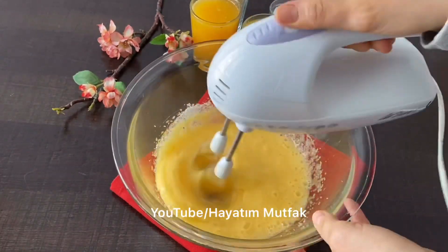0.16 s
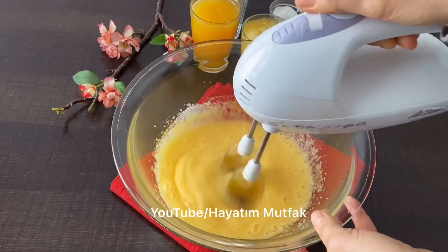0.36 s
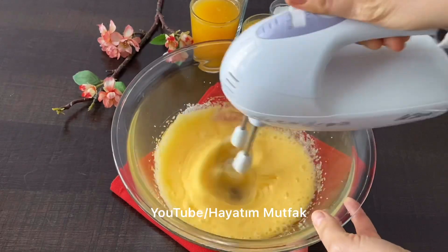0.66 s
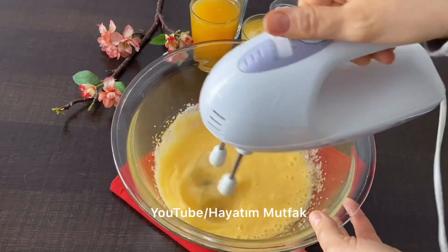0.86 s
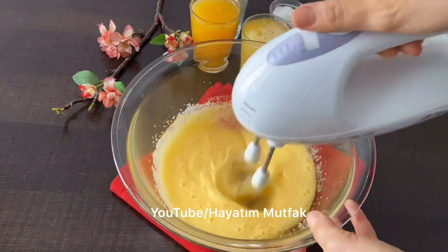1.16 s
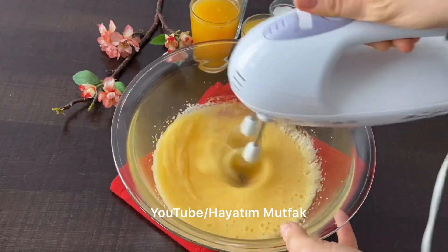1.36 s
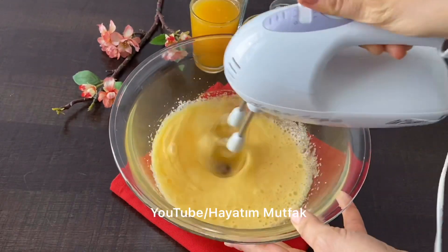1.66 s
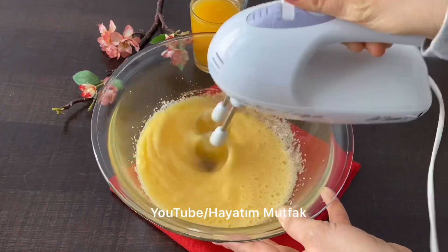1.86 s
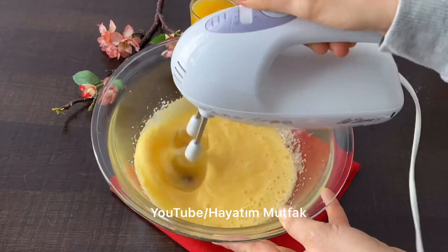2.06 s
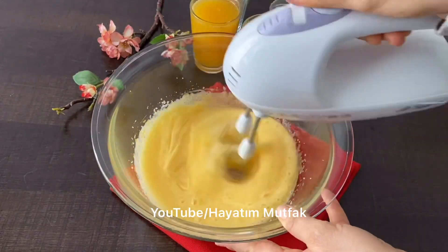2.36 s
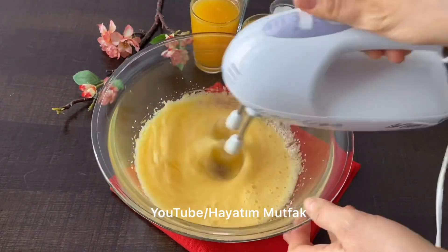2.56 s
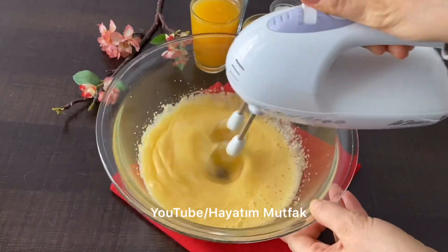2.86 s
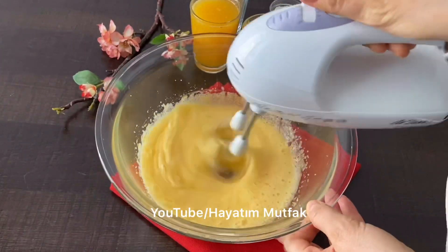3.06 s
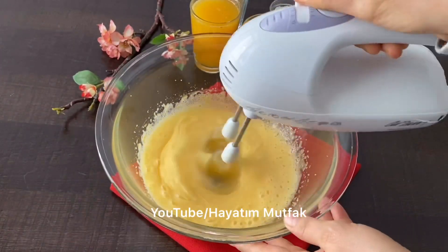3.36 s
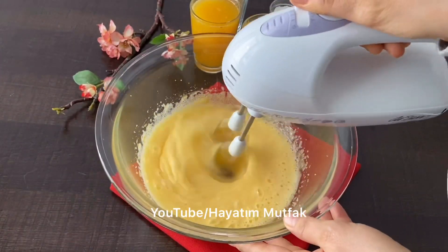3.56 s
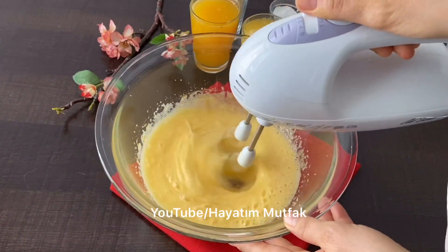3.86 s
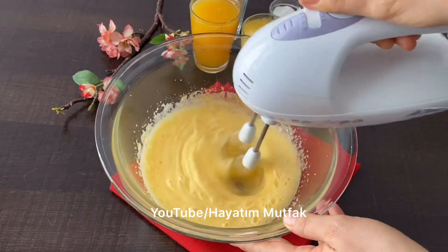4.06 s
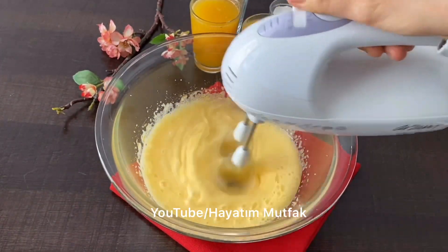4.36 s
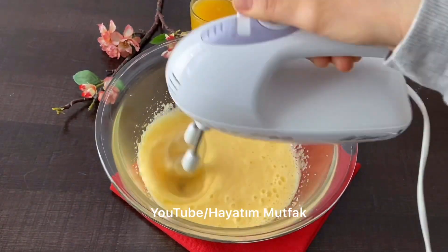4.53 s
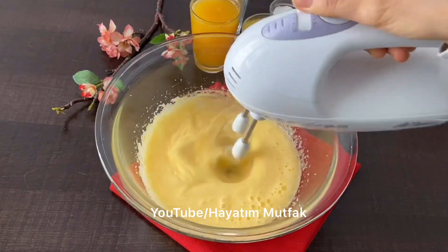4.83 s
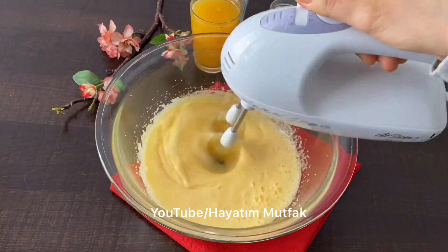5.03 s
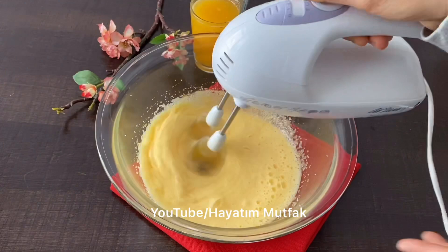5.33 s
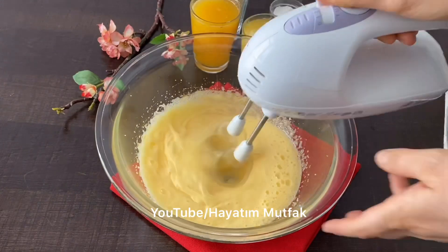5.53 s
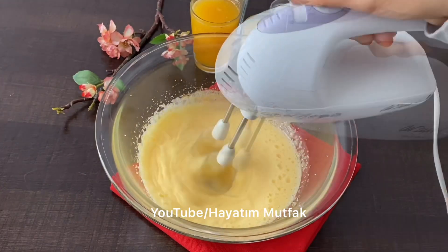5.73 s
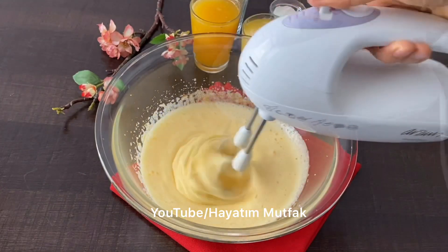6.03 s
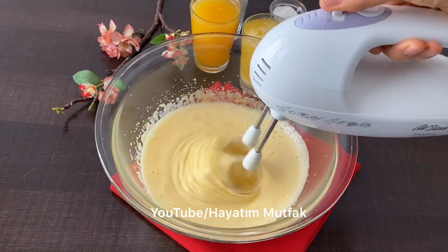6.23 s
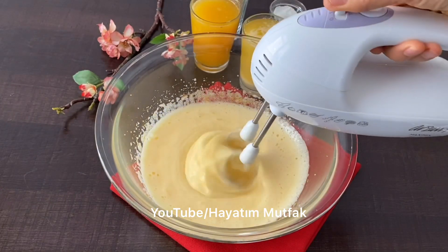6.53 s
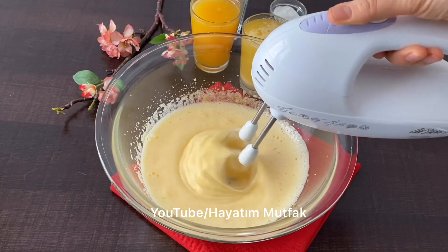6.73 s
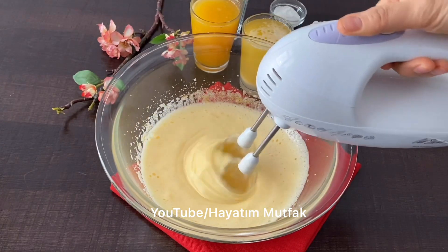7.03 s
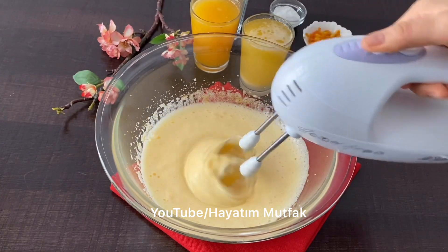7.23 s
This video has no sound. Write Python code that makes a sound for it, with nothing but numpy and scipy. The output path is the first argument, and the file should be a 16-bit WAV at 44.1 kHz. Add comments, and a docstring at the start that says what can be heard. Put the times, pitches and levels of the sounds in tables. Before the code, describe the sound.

A hand mixer whips eggs and sugar, heard very near in an ordinary room. Its wavering whine shifts slightly with the hand, over brush hiss, low pulsing slosh and small splashes. After a metallic tick it swells smoothly into a coarse top-speed growl of motor, gears and air. A sharp plastic click cuts the power; the pitch sinks while soft scrapes brush past.

```python
"""In a kitchen, close to a stereo pair of microphones, an electric hand mixer whips eggs and sugar
in a glass bowl. On low speed the fan whines in phase-locked tones, the brushes whistle and hiss, and
the beaters churn the batter in filtered noise. That fades into top speed: a rough roar of shaft tones
and noise. The switch snaps off in ringing modes and the motor winds down, throbbing, with soft scrapes."""
import sys
import numpy as np
from scipy import signal
from scipy.fft import rfft, irfft, next_fast_len
from scipy.io import wavfile
from scipy.ndimage import uniform_filter1d

SR = 44100
rng = np.random.default_rng(int(sys.argv[2]) if len(sys.argv) > 2 else 0)


def generate_wav(sig):
    """Save sig (samples, or channels by samples) to the path in sys.argv[1] as 16-bit PCM at SR."""
    pcm = np.round(np.clip(np.atleast_2d(sig).T, -1, 1) * 32767).astype(np.int16)
    wavfile.write(sys.argv[1], SR, pcm)


N = 325892

FAN_BLADES = 8  # blades that pass in one turn of the shaft
BLADES_PER_WIRE, BLADES_PER_TURN = 20, 80  # blades per passing beater wire, per beater turn
OFF_S = 6.675  # the current stops


def scene():
    """Low speed fades into top speed; batter splashes, wires tick and scrape, the switch snaps."""
    fade_start, fade_length = 5.348, 0.98  # s
    share = np.clip((np.arange(N) / SR - fade_start) / fade_length, 0, 1)
    slow = (1 - share) * low_speed()
    fast = share ** 0.87 * (top_speed() + draught())
    return slow + fast + splashes_and_scrapes() + ticks() + switch()


# low speed, sagging where the batter is deep and racing where it is thin: t/s, fan whine f/Hz
FAN_PITCH = [(0.0, 1472), (0.31, 1472), (0.46, 1535), (0.87, 1575), (1.33, 1565), (1.46, 1601),
             (1.64, 1570), (2.3, 1571), (2.85, 1566), (3.7, 1578), (4.3, 1578), (4.52, 1589), (4.87, 1594),
             (5.25, 1576), (5.5, 1577)]
# how hard the beaters churn, before each sound's own offset: t/s, level/dB
CHURN_EFFORT = [(0, -67), (0.6, -68), (0.95, -73), (1.3, -64), (1.99, -65.5), (2.09, -75), (2.2, -62.5),
                (2.3, -71), (2.4, -64.5), (2.9, -66.5), (4.45, -70.5), (4.75, -74), (5.3, -66.5)]
SWIRL_HZ, SWIRL_WANDER = 9.3, 2.4  # swirl rate; its wander in radians


def low_speed():
    """Motor, brushes and batter share one fan rotation and the uneven swirl round the beaters."""
    hz, = curves(FAN_PITCH)
    churn_db, = curves(CHURN_EFFORT)
    fan = angle(hz * (1 + 0.00025 * walk(60)))
    beat = np.sin(fan / BLADES_PER_WIRE)
    fan = fan + 0.018 * beat
    swirl = np.sin(2 * np.pi * SWIRL_HZ * np.arange(N) / SR + SWIRL_WANDER * walk(3.98))
    lull_db = lulls()
    motor = fan_whine(hz, fan, beat, swirl, lull_db) + brush_whistle(fan)
    motor = motor + brush_hiss(fan, swirl, lull_db, churn_db)
    batter = churn(beat, swirl, churn_db) + spatter(lull_db, churn_db) + gulps_and_rub()
    # hardly any deep bass leaves the small machine and its bowl at this speed
    bass_cut = signal.butter(3, 100, "high", fs=SR, output="sos")
    return signal.sosfilt(bass_cut, motor + batter)


# the housing colours the overtones of the whine as they move through it: f/Hz, level/dB
OVERTONE_COLOUR = [(2940, -15), (3090, -17.5), (3135, -21), (3160, -21), (3185, -16), (4400, -17.5),
                   (4700, -12), (4740, -12), (4780, -18), (5900, -31), (6300, -22.5), (7350, -16),
                   (7850, -18.5), (7950, -15), (9400, -36)]
# the whine as the hand moves the mixer round the bowl, before offsets: t/s, level/dB
WHINE_CURVE = [(0, -47), (.125, -47), (.153, -54), (.19, -46.5), (0.28, -48), (0.42, -44), (0.48, -47),
               (0.72, -46), (0.94, -42.5), (1.06, -48), (1.18, -42), (1.25, -48.5), (1.37, -43),
               (1.51, -41.5), (1.56, -43.5), (1.93, -46.5), (2.0, -44), (2.2, -45), (3.0, -44.5),
               (3.92, -41.5), (4.14, -44), (4.4, -42), (4.75, -43.5), (5.5, -46)]
# the whine shifts between the sides with the hand: t/s, left minus right level/dB
HAND_SWAY = [(0.0, -4.0), (0.46, -6), (0.6, -2.5), (0.86, -6), (2.71, -4.5), (4.11, -7), (4.51, -2.0),
             (5.4, -5.5)]


def fan_whine(hz, fan, beat, swirl, lull_db):
    """Passing fan blades give a tone and overtones, whose level swings with the swirling load."""
    whine_db = curves(WHINE_CURVE)[0] + 0.88 * swirl
    first = tone(fan, waver_db=.5, scatter=0.056, rate=18) * (1 + 0.09 * beat)
    first = first * pan(curves(HAND_SWAY)[0])
    upper = 0
    for k in range(2, 7):
        overtone = tone(k * fan, waver_db=1.5, scatter=0.32, rate=45)
        upper = upper + undb(at_hz(OVERTONE_COLOUR, k * hz)) * overtone
    # the overtones follow the hand half as far in dB
    return undb(whine_db + 2.0) * first + undb(.5 * whine_db + lull_db - 19.0) * upper


# the brushes break into a squeal: t/s, length/s, level/dB
BRUSH_SQUEALS = [(0.025, 0.3, -44.5), (0.388, 0.055, -42), (0.586, 0.11, -45.5), (1.07, 0.085, -44.5),
                 (1.227, 0.073, -45), (1.645, 0.31, -45.5), (2.19, 1.14, -46)]


def squeals():
    """Gain of the brush whistle: faint throughout, with squeals that rise, hold and fall."""
    t = np.arange(N) / SR
    edge, faint_db = 0.021, -53.5  # rise and fall in s; level between squeals
    bursts = 0
    for s, length, db in BRUSH_SQUEALS:
        inside = np.minimum(t - s, s + length - t)
        bursts = bursts + undb(db) * np.clip(inside / edge + .5, 0, 1)
    return np.maximum(bursts, undb(faint_db))


def brush_whistle(fan):
    """The rubbing brushes sing at eight times the fan tone, with a jittery phase."""
    return squeals() * tone(8 * fan + .3 * walk(160), waver_db=0.5, scatter=1.0, rate=30)


# spectrum of the brush hiss: f/Hz, level/dB per Hz
BRUSH_SPECTRUM = [(300, -33), (600, -10), (900, -3.5), (1150, 3.5), (1550, 9), (1900, 2.5), (2400, 1.5),
                  (2850, -1), (4400, 1), (6200, -2), (8700, 3), (11200, -1.5), (13100, -1.5), (15200, 0)]
# resonances and hollows of the motor cavity: f/Hz, width/Hz, lift level/dB
MOTOR_CAVITY = [(2320, 50, 5), (2800, 280, -3), (3350, 300, 0.5), (5800, 300, -1), (4180, 130, 4),
                (5150, 140, 3.5), (8730, 70, -1.5), (9240, 120, 2.5), (9500, 130, 3), (11140, 420, 5),
                (12070, 160, 7), (15100, 400, 0.5)]
HISS_DB, HISS_PER_CHURN = -45.5, 0.052  # mean level; dB more for each dB of churning


def brush_hiss(fan, swirl, lull_db, churn_db):
    """Sparking brushes hiss through the motor cavity, more as the load draws current."""
    sparking = undb(0.72 * walk(900) + 0.45 * walk(20) + 0.36 * swirl + lull_db / 2)
    sparking = sparking * (1 + 0.021 * np.sin(fan / FAN_BLADES))
    hiss_db = HISS_DB + HISS_PER_CHURN * (churn_db - churn_db.mean())
    return slow_noise(BRUSH_SPECTRUM, MOTOR_CAVITY) * sparking * undb(hiss_db)


# spectrum of the churned batter: f/Hz, level/dB per Hz
CHURN_SPECTRUM = [(40, -58), (85, -32), (130, -10.5), (235, -4.5), (370, -5), (470, -6.5), (700, -10.5),
                  (1200, 3), (3000, -51)]
# resonances of the bowl of batter: f/Hz, width/Hz, lift level/dB
BATTER_BOWL = [(233.3, 21, 10), (273, 37, 5.5), (372, 29, 8), (543, 40, 11)]


def churn(beat, swirl, churn_db):
    """Sloshing batter makes low noise in the bowl, pulsing with each passing beater wire."""
    slosh = undb(0.78 * walk(35) + 2 * swirl) * (1 + 0.27 * beat)
    return slow_noise(CHURN_SPECTRUM, BATTER_BOWL) * slosh * undb(churn_db + 3.0)


# wet spatter off the beaters: f/Hz, level/dB per Hz
SPATTER_SPECTRUM = [(1500, -39), (3200, -11), (4300, 4), (5200, -0.5), (6500, -11), (12000, -12)]


def spatter(lull_db, churn_db):
    """Drops fly off the beaters in uneven bright noise that follows the churning."""
    uneven_db = 10.5 * np.tanh(walk(70))
    return slow_noise(SPATTER_SPECTRUM) * undb(churn_db + 2 * lull_db + 3 + uneven_db)


# gulps of air in the batter, and a soft rub against the bowl at 4.4 s:
# t/s, level/dB, f/Hz, rise/s, t60/s
GULPS_AND_RUB = [(.755, -42.5, 790, .003, 0.085), (1.455, -62, 84.5, .02, 0.25),
                 (2.165, -46, 722, .002, 0.18), (2.192, -53, 360, .005, 0.18), (4.41, -54, 190, .04, 0.35)]


def gulps_and_rub():
    """Gulps of air in the batter and a slow-rising rub of the bowl: brief tones that sink in pitch."""
    out = 0
    for s, db, hz, rise, t60 in GULPS_AND_RUB:
        age, envelope = ring(s, t60, rise)
        sinking = hz * (1 + .07 * np.exp(-age / .018))  # 7 % sharp at first, settling in 18 ms
        out = out + undb(db) * envelope * np.sin(angle(sinking) + 0.66 * walk(200))
    return out


# the beaters run through thin batter and the treble dips: t/s, level/dB
THIN_BATTER = [(.74, 0), (1.08, -0.5), (1.92, -2.5), (4.46, -3.5)]


def lulls():
    """Dips in dB as the beaters meet thin batter; each sound takes its own share."""
    t = np.arange(N) / SR
    half_length = 0.047  # s
    return sum(db * np.exp(-((t - s) / half_length) ** 2) for s, db in THIN_BATTER)


# low speed by way of the walls: f/Hz, side minus mid level/dB
SLOW_WALLS = [(200, -23), (550, -16.5), (780, -17), (1000, -27), (1550, -23), (2100, -7.5), (2750, -5.5),
              (3300, -14), (3950, -5.5), (4700, -21), (5900, 0.5), (7200, -37), (10000, -27), (11500, -9),
              (13800, -24), (15000, -25)]
# balance on low speed: f/Hz, left minus right level/dB
SLOW_BALANCE = [(700, -0.8), (2380, 1.5), (4400, .5), (8120, 0.5), (15000, 1.5)]


def slow_noise(spectrum, lifts=()):
    """Coloured noise of rms 1, spread over the microphones as on low speed."""
    return unit(colour(stereo_noise(SLOW_WALLS, SLOW_BALANCE), spectrum, lifts))


TOP_FAN_HZ = 2549
COAST_HZ_PER_S, DRAG_S = 1600, 4.5  # first rate of fall; time constant of the easing drag


def coasting():
    """Fan pitch on top speed: steady until the current stops, then falling, less steeply as drag eases."""
    age = np.maximum(np.arange(N) / SR - OFF_S, 0)
    return TOP_FAN_HZ - COAST_HZ_PER_S * DRAG_S * (1 - np.exp(-age / DRAG_S))


def top_speed():
    """Hum, fan, gears and air share one shaft and its coasting; the bowl shakes."""
    hz = coasting()
    speed = hz / TOP_FAN_HZ
    shaft = angle(hz / FAN_BLADES * (1 + 0.00081 * walk(30)))
    uneven = shaft + 0.021 * walk(120)  # uneven turning roughens the high lines most
    turn = shaft * FAN_BLADES / BLADES_PER_TURN
    powered = np.arange(N) / SR < OFF_S
    motor = shaft_hum(hz, speed, uneven, turn, powered) + fan_tone(hz, speed, uneven, turn, powered)
    gears = gear_rumble(shaft, speed) + gear_rattle(turn)
    return motor + gears + rushing_air(shaft, speed) + bowl_shake()


# lines of the shaft: whole multiple of the shaft rate, level/dB under power, level/dB coasting
SHAFT_ORDERS = [(1, -13, -13.5), (2, -11.5, -11.5), (3, -21.5, -21), (4, -15.5, -14.5), (5, -20.5, -22),
                (12, -21, -21), (16, -16, -27), (19, -39, -34), (22, -37, -40), (24, -37, -26.5)]


def shaft_hum(hz, speed, uneven, turn, powered):
    """An unbalanced shaft hums at multiples of its rate and throbs under the load of the beaters."""
    hum = 0
    for k, on_db, off_db in SHAFT_ORDERS:
        # the balance of the lines changes when the current stops
        line_db = np.where(powered, on_db, off_db) + flare(k * hz / FAN_BLADES)
        hum = hum + undb(line_db) * tone(k * uneven, waver_db=2.5, scatter=0.47, rate=25)
    throb = 1 + 0.27 * np.sin(turn / 2 + 1.2 * walk(17))
    return hum * undb(-28.5) * speed ** 2 * throb  # unbalance forces go with the square of the speed


def fan_tone(hz, speed, uneven, turn, powered):
    """The blades' tone throbs once a beater turn, more deeply while coasting."""
    depth = np.where(powered, .3, .5)
    throb = 1 + depth * np.sin(turn + 1.16 * walk(25))
    blades = tone(FAN_BLADES * uneven, waver_db=1.0, scatter=0.3, rate=60)
    return blades * throb * undb(-37.5 + flare(hz)) * speed ** 1.36


# motor lines flare as they pass sharp resonances of the housing: f/Hz, width/Hz, lift level/dB
SHARP_RESONANCES = [(275, 90, 9), (2410, 80, 6), (2255, 190, 10.5), (4050, 400, 6), (4420, 450, 9),
                    (5560, 400, 13)]


def flare(hz):
    """Decibels that the housing adds to a motor line at its current pitch."""
    return lift_at(SHARP_RESONANCES, hz)


# spectrum of the gear rumble: f/Hz, level/dB per Hz
RUMBLE_SPECTRUM = [(25, -41), (48, -3.5), (75, -9.5), (120, -15), (190, -14), (280, -7.5), (360, -4),
                   (420, -2.5), (510, -6), (700, -8), (1030, -12.5), (1260, -12.5), (1500, -24.5),
                   (2200, -52)]
# resonances and hollows of the housing: f/Hz, width/Hz, lift level/dB
HOUSING_RESONANCES = [(96, 6.1, 10), (107, 15, -5), (378, 35, 8), (1037, 190, 8), (1286, 43, 6.5),
                      (1475, 63, -1.5), (1923, 42, 6.5), (2200, 57, 8.5), (2317, 83, 9.5), (2430, 50, 7),
                      (2700, 110, 0.5), (2945, 96, 7.5), (4080, 90, -5), (4080, 200, 4), (4490, 290, -7),
                      (5600, 140, 3), (6200, 300, -6), (6860, 140, -7)]


def gear_rumble(shaft, speed):
    """The gears rumble through the housing, chattering with each passing beater wire."""
    chatter = undb(0.5 * walk(120) + 0.77 * walk(30))
    chatter = chatter * (1 + 0.11 * np.sin(shaft * FAN_BLADES / BLADES_PER_WIRE))
    return fast_noise(RUMBLE_SPECTRUM, HOUSING_RESONANCES) * chatter * undb(-33) * speed ** 0.83


# spectrum of the rushing air: f/Hz, level/dB per Hz
AIR_SPECTRUM = [(700, -38), (1200, 0), (1500, 1), (2000, 1), (2300, -3.5), (2700, -1.5), (4100, -1),
                (5500, -3.5), (6600, -10.5), (8000, -21), (15500, -35)]


def rushing_air(shaft, speed):
    """Air rushes through the housing and out of the vents, rasping once a shaft turn."""
    rasp = undb(0.83 * walk(500)) * (1 + 0.076 * np.sin(shaft))
    rush = fast_noise(AIR_SPECTRUM, HOUSING_RESONANCES) * undb(-31.5)
    return (rush + vent_hiss()) * rasp * speed ** 1.92


# cooling air from the vents, nearer to the right microphone: f/Hz, level/dB per Hz
VENT_SPECTRUM = [(4500, -45), (6000, 3), (7000, 3.5), (10300, 1), (14000, -2), (15500, -1.5)]


def vent_hiss():
    """Cooling air leaves the vents, heard directly and, 16 dB weaker, off the walls."""
    heard = left_late(rng.standard_normal(N)) + undb(-16) * rng.standard_normal((2, N))
    return unit(colour(heard, VENT_SPECTRUM)) * undb(-36.5)


# top speed by way of the walls: f/Hz, side minus mid level/dB
FAST_WALLS = [(60, -18), (130, -13), (300, -12.5), (700, -6.5), (1250, -11), (1500, 2), (1900, -21),
              (2300, -15), (3400, -5.5), (5500, -10), (6500, -26)]
# balance on top speed: f/Hz, left minus right level/dB
FAST_BALANCE = [(60, 4), (110, -5.5), (200, -0.5), (380, -4), (700, 3.5), (1290, -2), (2380, 0.5),
                (4400, 2), (8120, 2), (15000, -1.5)]


def fast_noise(spectrum, lifts=()):
    """Coloured noise of rms 1, spread over the microphones as on top speed."""
    return unit(colour(stereo_noise(FAST_WALLS, FAST_BALANCE), spectrum, lifts))


# ring of the housing under gear knocks: f/Hz, level/dB, t60/s
RATTLE_MODES = [(316, -4.5, 0.051), (377, -6.5, 0.052), (424, -14, 0.057)]


def gear_rattle(turn):
    """Gear backlash knocks about once a beater turn, each time with another force, and rings the housing."""
    loose = np.maximum.accumulate(turn / (2 * np.pi) + 0.249 * walk(30))  # loose timing, in turns
    knocks = np.diff(np.floor(loose), prepend=np.floor(loose[0]))
    knocks = knocks * undb(2.5 * np.tanh(walk(40)))
    rung = signal.fftconvolve(knocks, strike(0, RATTLE_MODES, rise=0.0028))[:N]
    return unit(rung) * undb(-41) * pan(at_hz(FAST_BALANCE, RATTLE_MODES[0][0]))[:, None]


# spectrum of the shaking bowl: f/Hz, level/dB per Hz
SHAKE_SPECTRUM = [(40, -37), (80, 4), (96, -4.5), (125, -3), (400, -22), (2000, -76)]
# its swells, before the fade into top speed: t/s, level/dB
SHAKE_LEVEL = [(5.55, -48), (5.64, -35.5), (5.9, -46), (6.1, -53), (6.9, -45.5), (7.15, -43.5), (7.27, -36),
               (7.39, -49)]


def bowl_shake():
    """The beaters shake the bowl in swells of low noise."""
    return fast_noise(SHAKE_SPECTRUM) * undb(curves(SHAKE_LEVEL)[0])


# the speed switch snaps, rebounds and settles, before offsets: t/s, level/dB, body thud level/dB
SWITCH_BLOWS = [(6.682, -0.5, -23), (6.6829, -13, -5), (6.6858, -4, -8), (6.688, -20, -15),
                (6.904, -16.5, -36)]
# its plastic slider: f/Hz, level/dB, t60/s
SLIDER_MODES = [(6240, -0.5, 0.0014), (9050, -7, 0.0024), (14040, -3.5, 0.0028), (14700, -9, .003)]
# the housing under the switch: f/Hz, level/dB, t60/s
BODY_MODES = [(340, -17, 0.016), (1280, -8, 0.0051), (1680, -5, 0.003), (2270, -23, 0.0032)]
# spray from the worktop and walls: f/Hz, level/dB per Hz
SPRAY_SPECTRUM = [(500, -2), (2000, 0), (4500, 5), (6500, 6.5), (15000, -6)]


def switch():
    """Dry plastic cracks over a thud, with a short spray from the worktop and walls."""
    cracks = 0
    for s, db, body_db in SWITCH_BLOWS:
        snap = undb(db + 8.0) * left_late(strike(s, SLIDER_MODES, rise=0.00031))
        cracks = cracks + snap + undb(body_db + 2.0) * strike(s, BODY_MODES, rise=0.00028)
    spray = unit(colour(rng.standard_normal((2, N)), SPRAY_SPECTRUM))
    _, dying = ring(SWITCH_BLOWS[0][0], t60=0.11, rise=0.001)
    return cracks + undb(-21.5) * spray * dying


# batter splashes, then soft scrapes of wire or plastic as the motor coasts:
# t/s, level/dB, centre f/Hz, rise/s, t60/s
SPLASHES_AND_SCRAPES = [(.84, -43.5, 4380, .03, .35), (1.225, -50, 4400, .01, .25),
                        (1.241, -39, 4800, .0005, .02), (1.563, -47, 3000, .001, .04),
                        (2.165, -45, 4600, .01, .25), (7.05, -44, 7500, .002, .13),
                        (7.228, -36.5, 6800, .002, 0.093), (7.264, -39.5, 9800, .002, 0.12)]


def splashes_and_scrapes():
    """Batter splashes, then soft scrapes of wire or plastic: short bursts of noise round a centre pitch."""
    out = 0
    for s, db, hz, rise, t60 in SPLASHES_AND_SCRAPES:
        burst = slow_noise([(hz / 10, -70), (hz / 2, -18), (hz, 0), (hz * 2, -15)])
        out = out + undb(db) * burst * ring(s, t60, rise)[1]
    return out


# beater wires ticking together: t/s, level/dB, f/Hz
WIRE_TICKS = [(5.504, -35, 2700), (5.509, -38, 2180), (5.518, -28.5, 2440), (5.547, -31.5, 1680),
              (5.558, -28.5, 2530)]
# their ring: multiple of the tick's f, level/dB, t60/s
WIRE_MODES = [(1, 0.5, 0.048), (.92, -9, 0.058), (2.33, -15, .04), (2.6, -7.5, 0.048)]


def ticks():
    """The steel beater wires touch and ring."""
    out = 0
    for s, db, hz in WIRE_TICKS:
        modes = [(hz * k, mode_db, t60) for k, mode_db, t60 in WIRE_MODES]
        out = out + undb(db) * strike(s, modes, rise=0.00078)
    return out


# cooling air across the microphones: f/Hz, level/dB per Hz
DRAUGHT_SPECTRUM = [(25, -30), (55, -4), (120, -6.5), (200, -7), (400, -35)]
# its strength, before the fade into top speed: t/s, level/dB
DRAUGHT_STRENGTH = [(6.0, -75), (6.07, -41.5), (6.32, -40), (6.5, -48.5), (6.78, -43), (6.88, -72)]


def draught():
    """Air from the vents buffets each microphone on its own: a wide, low flutter."""
    buffeting = unit(colour(rng.standard_normal((2, N)), DRAUGHT_SPECTRUM))
    return buffeting * undb(curves(DRAUGHT_STRENGTH)[0])


def tone(phase, waver_db, scatter, rate):
    """A motor line: a direct part that wavers, and shifting reflections on each side."""
    direct = undb(waver_db * walk(rate)) * np.sin(phase)
    return direct + scatter * np.array([walk(rate) * np.cos(phase) for _ in range(2)])


def ring(s, t60, rise):
    """Time since a blow and its swelling, dying envelope."""
    age = np.maximum(np.arange(N) / SR - s, 0)
    dying = np.exp(-np.minimum(np.log(1000) * age / t60, 50))
    return age, (1 - np.exp(-age / rise)) * dying


def strike(s, modes, rise):
    """The modes of a hard part ring from one blow."""
    out = 0
    for hz, db, t60 in modes:
        age, envelope = ring(s, t60, rise)
        out = out + undb(db) * envelope * np.sin(2 * np.pi * hz * age)
    return out


def left_late(x):
    """A sound that reaches the right microphone first, the left one 0.295 ms later."""
    return np.array([np.roll(x, round(.000295 * SR)), x])


def stereo_noise(side_db, pan_db):
    """Noise that reaches the two sides partly alike, partly by way of the walls."""
    mid, side = rng.standard_normal((2, N))
    side = colour(side, side_db)
    left = colour(mid + side, [(f, db / 2) for f, db in pan_db])
    right = colour(mid - side, [(f, -db / 2) for f, db in pan_db])
    return np.array([left, right])


def pan(db):
    """Left and right gains for a curve of level difference."""
    return undb(np.array([db, -db]) / 2)


def colour(x, points, lifts=()):
    """Filter by a spectrum with resonances on top of it."""
    size = next_fast_len(N)
    hz = np.arange(size // 2 + 1) * SR / size
    db = at_hz(points, hz) + lift_at(lifts, hz)
    return irfft(rfft(x, size) * undb(db), size)[..., :N]


def lift_at(resonances, hz):
    """Decibels that resonances add at a frequency."""
    return sum(lift / (1 + (2 * (hz - f) / width) ** 2) for f, width, lift in resonances)


def at_hz(points, hz):
    """Read a spectrum on a log-frequency axis."""
    f, value = np.transpose(points)
    return np.interp(np.log(hz + 1e-3), np.log(f), value)


def curves(table):
    """The columns of a timed table, one value per sample."""
    s, *columns = np.transpose(table)
    return [np.interp(np.arange(N) / SR, s, c) for c in columns]


def walk(rate):
    """Smooth chance of rms 1 that changes about rate times a second."""
    k = max(int(SR / rate), 2)
    steps = np.repeat(rng.standard_normal(N // k + 1), k)
    return unit(uniform_filter1d(steps, k)[:N])


def angle(hz):
    """Running phase of a rate."""
    return 2 * np.pi * np.cumsum(hz) / SR


def undb(db):
    """Decibels to gain."""
    return 10 ** (np.asarray(db) / 20)


def unit(x):
    """Scale to rms 1."""
    return x / np.sqrt(np.mean(x ** 2))


def record(dry):
    """The recorder cuts the top with a steep low-pass at 15.8 kHz."""
    return signal.sosfilt(signal.ellip(10, .2, 80, 15800, fs=SR, output="sos"), dry)


dry = scene()
out = record(dry)
generate_wav(out)
```